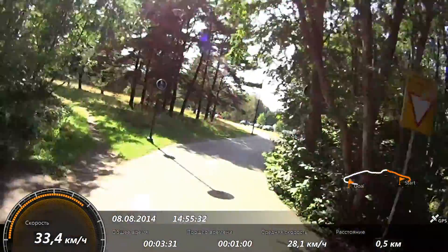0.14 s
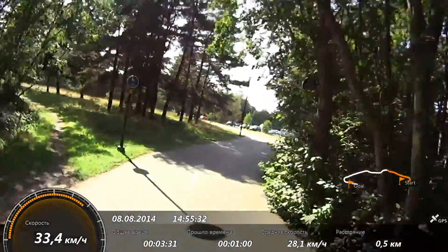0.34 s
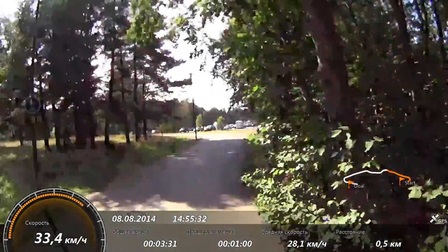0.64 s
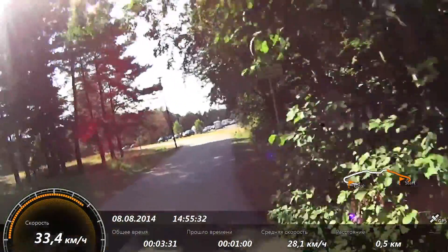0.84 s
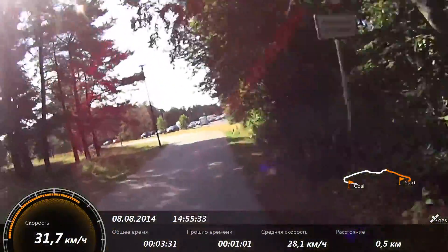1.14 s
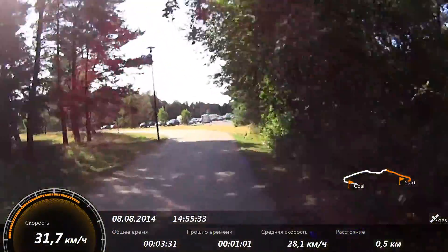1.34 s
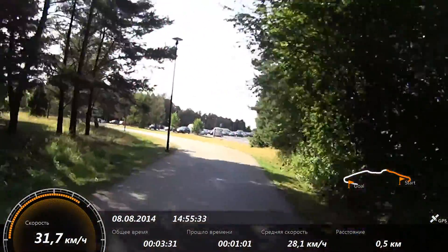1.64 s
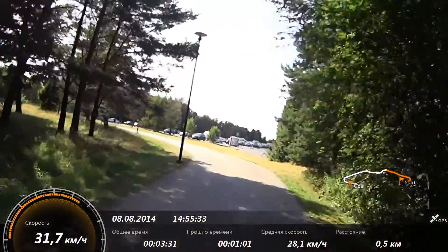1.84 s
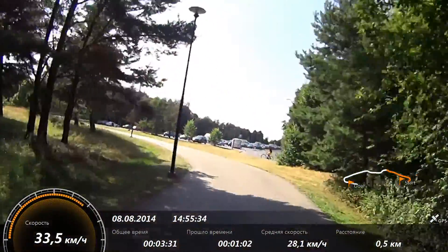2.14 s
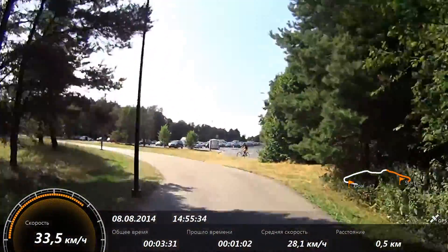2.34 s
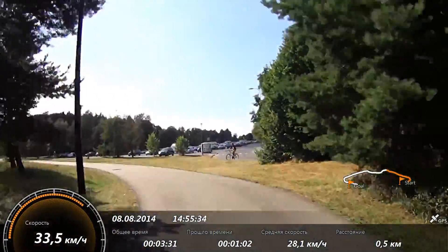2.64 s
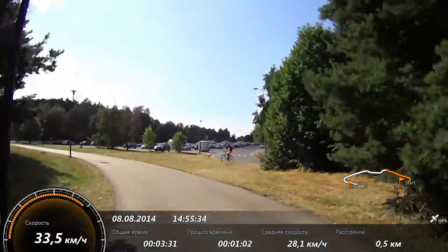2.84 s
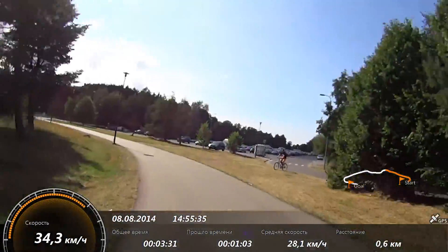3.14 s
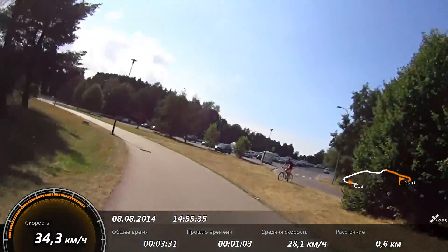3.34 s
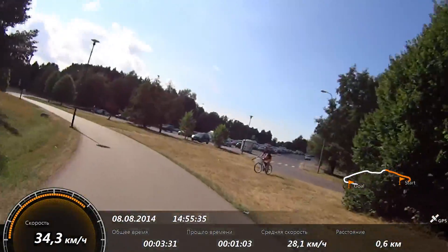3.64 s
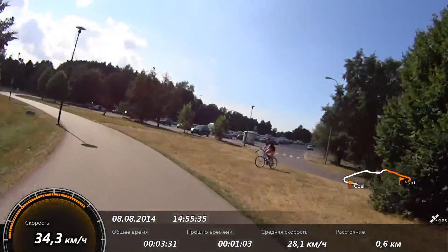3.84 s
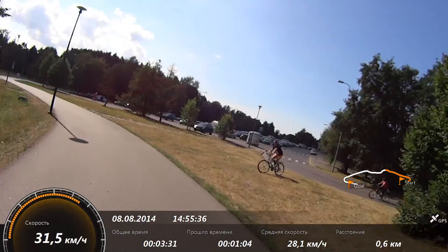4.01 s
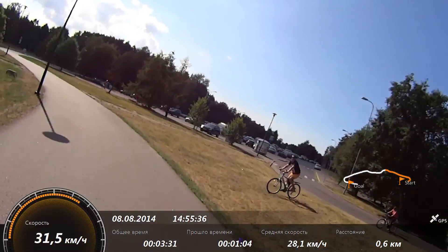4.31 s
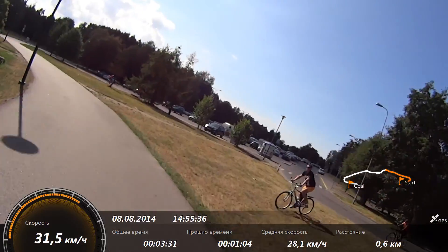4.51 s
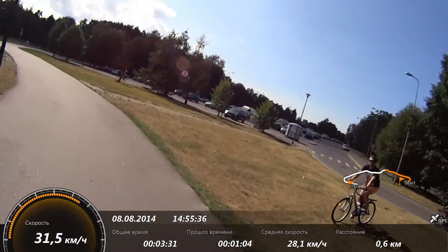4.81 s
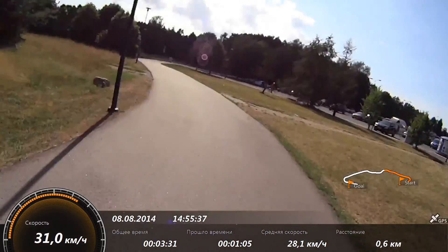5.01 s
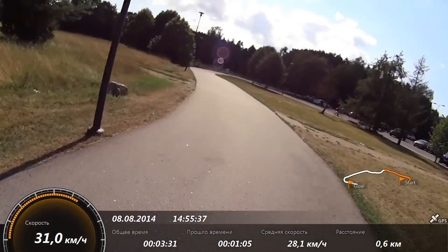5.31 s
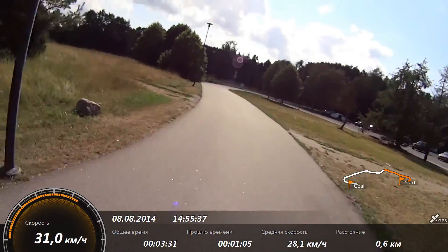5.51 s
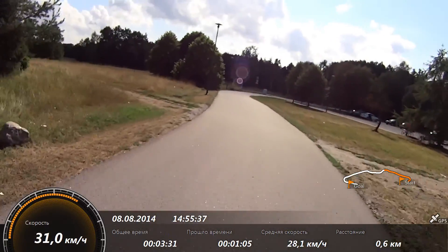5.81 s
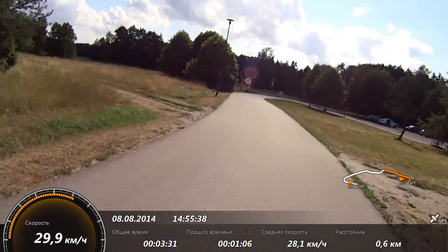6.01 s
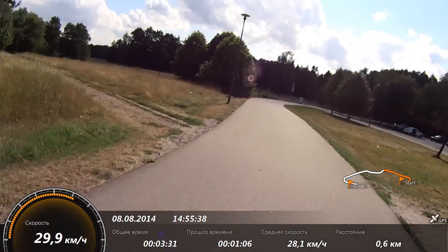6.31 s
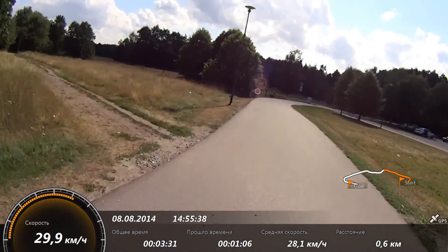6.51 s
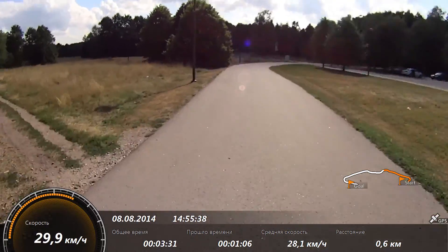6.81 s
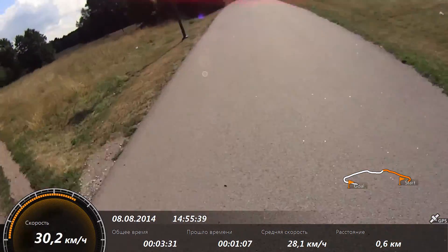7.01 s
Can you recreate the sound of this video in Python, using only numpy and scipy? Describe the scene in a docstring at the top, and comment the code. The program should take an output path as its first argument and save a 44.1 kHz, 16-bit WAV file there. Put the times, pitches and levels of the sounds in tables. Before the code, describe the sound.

Continuous rough rolling of small hard wheels on asphalt, with a hollow boom and faintly pitched whirr, dominates a dry outdoor stereo pickup. Wind buffets and flutters low, with soft airy hiss above. The roll eases, takes a few rough patches, knocks once, swells strongly near five seconds, then sinks to a short lull. A small tick sounds in the lull, the roll comes back weaker, and the gear clicks rapidly at the end.

```python
"""On a bend of an asphalt path, inline skates coast past at the wearer's own feet, heard at a worn camera.
Road grain excites the resonances of wheels and frames; the roll dips and swells, and single pitches stand out.
Turbulence rumbles and flutters at the two microphone ports, buffets push, and soft rush and hiss swell.
The gear knocks as short damped modes with a crack and thump; a stone chip ticks as decaying noise."""
import sys
import numpy as np
from scipy import signal
from scipy.fft import rfft, irfft
from scipy.io import wavfile

SR = 44100
rng = np.random.default_rng(int(sys.argv[2]) if len(sys.argv) > 2 else 0)


def store_wav(level_fs):
    """Save 16-bit WAV to argv[1]."""
    pcm = np.round(np.clip(np.atleast_2d(level_fs), -1, 1) * 32767)
    wavfile.write(sys.argv[1], SR, pcm.T.astype(np.int16))


N = 315315
TIME, FREQS = np.arange(N) / SR, np.fft.rfftfreq(N, 1 / SR)

# All spectra are relative: the coloured noise is scaled to rms 1 afterwards.
# Likeness of the two ports: pitch_hz, likeness (0 to 1)
PORT_LIKENESS = [(150, .99), (260, .85), (345, .45), (460, .78), (710, .55), (780, .93), (1200, .86),
                 (1600, .6), (2300, .2), (3100, .6), (4300, .35), (4750, .65), (7500, .35), (10500, .8)]
# Phase between the ports: pitch_hz, left_leads_rad
PORT_LEAD = [(30, -.1), (120, -.35), (310, -.75), (460, -2.1), (600, -2), (700, -2.8), (800, -1.45),
             (1150, -1.15), (1440, -.1), (1620, -1.2), (1850, -2.8), (2200, -2.3), (2700, -1), (4000, -.1)]
# Level between the ports: pitch_hz, left_minus_right_db
PORT_DIFFERENCE = [(250, 0), (340, 2.3), (480, -1.5), (690, -2.8), (760, 3), (1000, 2.7), (1280, -2.5),
                   (1520, -5.5), (1750, -.3), (2600, .5), (4400, -1.5), (5100, -3.5), (6000, 0),
                   (10000, -.7)]

# Base curve of the roll: time_s, level_db (before each layer's offset), contact_coarseness_db
ROLL_CURVE = [(0.0, -22.5, 0), (0.6, -24.2, 0), (1.62, -26.5, 0), (1.85, -23.5, -1.5), (2.9, -30, 1),
              (3.7, -30, -0.5), (4.1, -29, -0.5), (4.65, -28.5, .3), (5.08, -22, -0.5), (5.28, -22.5, 1.5),
              (5.38, -21, 4.5), (5.7, -21.5, 2), (5.86, -26.5, 2.5), (6.2, -32, 6.5), (6.36, -41.5, 9),
              (6.64, -45.5, 9.5), (6.76, -30, 1), (7.15, -34, 6)]
# Rough patches of asphalt that alter the roll: middle_s, length_s (between 1/e points),
# level_change_db, coarseness_change_db
ROUGH_PATCHES = [(0.718, 0.14, 1, 1), (3.08, 0.084, 5.5, -0.5), (3.316, 0.096, 2.5, 0.5),
                 (3.482, 0.056, -0.5, 3.5), (5.59, 0.033, 0.5, 3), (5.944, 0.061, 2.5, 2),
                 (6.486, 0.11, 5, -0.5)]
# Resonances of wheels, frames and boots, and a notch: pitch_hz, width_hz (where the lift halves), lift_db
SKATE_RESONANCES = [(462, 39, 6.5), (777, 100, 7), (1239, 107, 5), (1456, 120, 8), (1860, 250, -0.5),
                    (2197, 170, 3.5)]
# Ring of the wheels: pitch_hz, density_db
RING_SPECTRUM = [(500, -24), (850, -47), (980, -8), (1120, 3), (1350, 1.5), (1600, 0.5), (1800, 1),
                 (2100, -18.5), (3000, -25), (6000, -41.5)]
# Boom of the boots: pitch_hz, density_db
BOOM_SPECTRUM = [(60, -26), (250, -9.5), (380, -8.5), (540, -4.5), (680, 0.5), (860, 1), (1000, -5),
                 (1400, -21), (3000, -73)]
# Rasp at the contact patch: pitch_hz, density_db
RASP_SPECTRUM = [(1000, -40), (1700, -18.5), (2000, 3.5), (2400, 0), (2800, -2.5), (3300, -9.5),
                 (4000, -16.5), (5000, -14.5), (6200, -22), (7600, -26), (9300, -28.5), (11000, -47)]
# Spells when one resonance of the wheels stands out: start_s, end_s, pitch_hz, half_width_hz (at -6 dB),
# level_db, left_minus_right_db (added to the difference between ports)
RESONANCE_SPELLS = [(-.15, 0.647, 1494, 99, -27.5, 4.5), (1.696, 2.444, 1400, 100, -37, -2),
                    (2.987, 3.594, 2000, 219, -37, 5.5), (5.218, 5.85, 2350, 218, -27.5, 2),
                    (6.117, 6.755, 3450, 480, -43.5, 7)]
# Shifts of weight that narrow or widen the upper ring: start_s, end_s, side_change_db
WEIGHT_SHIFTS = [(-.2, 0.6, -4.5), (0.55, 1.78, 3.5), (1.75, 2.95, -2), (2.95, 3.58, -6), (3.55, 4.25, 3.5),
                 (4.2, 5.1, 1), (6.25, 6.52, -4)]

# Airflow over the microphone: time_s, level_db (before unsteadiness and each layer's offset)
AIRFLOW = [(0.0, -35.5), (0.42, -39), (0.58, -37), (1.6, -36), (1.9, -39), (2.3, -40), (3.5, -38.5),
           (4.62, -36), (4.75, -29.5), (5.02, -34.5), (5.35, -29.5), (5.75, -30.5), (6.15, -41.5),
           (6.6, -52.5), (6.76, -40.5), (7.15, -40)]
# Gusts that break into fast flutter: start_s, end_s, small_eddy_lift_db
FLUTTER_GUSTS = [(-.2, 0.7, 6), (0.546, 1.85, 12), (1.797, 2.95, 6), (3.686, 4.162, 11.5),
                 (4.096, 4.703, 6), (4.745, 5.08, 8)]
# Rumble of large eddies: pitch_hz, density_db
LARGE_EDDY_SPECTRUM = [(20, -12), (50, -8.5), (85, -1.5), (130, 0.5), (170, -9.5), (260, -14), (1000, -82)]
# Flutter of small eddies: pitch_hz, density_db
SMALL_EDDY_SPECTRUM = [(60, -24), (120, -6.5), (165, 2), (210, -2), (270, -7), (350, -10), (500, -14.5),
                       (1500, -62)]
# Swells of soft rush: start_s, end_s, level_db (before the common offset)
RUSH_SPELLS = [(-.1, 0.558, -41.5), (0.598, 1.436, -42.5), (1.463, 2.338, -44.5), (2.35, 2.9, -45.5),
               (3.003, 3.517, -45.5), (3.67, 4.038, -48.5), (4.198, 5.142, -48.5), (5.91, 5.99, -41),
               (6.1, 6.747, -48), (6.86, 7.158, -42)]
# Soft rush: pitch_hz, density_db
RUSH_SPECTRUM = [(1500, 2), (2600, -7), (3300, 4), (3950, 2.5), (4300, -0.5), (4700, -2.5), (5350, -0.5),
                 (5800, -10), (11000, -33)]
# Steady open air: pitch_hz, density_db
AIR_SPECTRUM = [(100, 7), (1000, 8), (3000, 3.5), (6000, -13), (9500, -1.5), (11000, -3)]
# Spells of thin hiss: start_s, end_s, level_db (before the common offset and flicker)
HISS_SPELLS = [(-.02, 0.514, -45.5), (1.775, 2.346, -47.5), (2.958, 3.545, -52), (4.958, 5.152, -46.5)]
# Thin hiss: pitch_hz, density_db
HISS_SPECTRUM = [(3000, -25), (4200, -7), (4700, 3.5), (5100, 2), (5500, 0.5), (5800, -3.5), (6150, -5),
                 (6500, 0.5), (7200, -6.5), (7550, -18), (11000, -30)]
# Slow pressure buffets: middle_s, level_db (added in amplitude to the steady churn)
PRESSURE_BUFFETS = [(0.24, -40), (0.65, -36), (1.49, -39), (2.42, -38.5), (3.1, -31), (3.18, -43),
                    (3.56, -41), (4.26, -38), (6.18, -28.5), (6.92, -44)]
# Slow pressure: pitch_hz, gain_db
BUFFET_SPECTRUM = [(8, -36), (20, 3.5), (35, 0), (55, 0.5), (90, -2.5), (250, -72), (1000, -80)]

# Knocks of the gear: start_s, ring_db (before the common offset), pitch_hz (main mode),
# upper_modes_db, crack_db (before the common offset), thump_db
GEAR_KNOCKS = [(4.204, -4, 1190, -2, -26.5, -48), (5.188, -3, 1210, -16, -52, -47),
               (7.008, -18, 1110, -1, -50, -26), (7.0195, -5, 1173, 5, -34, -28),
               (7.079, -9, 1220, 1.5, -45, -35)]
# Modes of a knock: ratio (to the main pitch), level_db, t60_s
GEAR_MODES = [(.68, -18, 0.026), (1, 2.5, 0.014), (1.3, -4.5, 0.0075), (1.94, -10.5, .014),
              (2.38, -13.5, .016), (3.4, -27, 0.0083)]
# Crack of a knock: pitch_hz, density_db
CRACK_SPECTRUM = [(300, -22), (900, 11), (2800, -20), (4000, 10), (5000, -13), (8000, -20), (11000, -32)]
# Thump of a knock: pitch_hz, density_db
THUMP_SPECTRUM = [(30, -4), (80, 6.5), (200, -7), (700, -12), (1500, -46)]
# Stone chip flicked by a wheel: start_s, level_db
STONE_CHIPS = [(6.5124, -16.5)]
# Tick of a chip: pitch_hz, density_db
CHIP_SPECTRUM = [(300, -19), (1300, 1), (3200, 6), (4600, -10), (7000, -1.5), (11000, -6)]


def gain_of(db):
    """Logarithmic level: decibels become an amplitude ratio."""
    return 10 ** (np.asarray(db) / 20)


def evened(x):
    """Normalization of power: scales a signal to rms 1."""
    return x / np.sqrt(np.mean(x ** 2) + 1e-20)


def read(points):
    """Logarithmic frequency: interpolates (Hz, value) points over every bin on a log axis."""
    hz, value = np.transpose(points)
    return np.interp(np.log(FREQS + 1), np.log(hz + 1), value)


def follow(rows):
    """Linear interpolation: gives each column of a time curve sample by sample."""
    times, *columns = np.transpose(rows)
    return [np.interp(TIME, times, column) for column in columns]


def spell(start, end, fade_s):
    """Trapezoidal envelope: rises from 0 to 1, holds, and falls again by the end."""
    return np.clip(np.minimum(TIME - start, end - TIME) / fade_s, 0, 1)


def hump(middle, length):
    """Gaussian envelope: rises smoothly to 1 and falls."""
    return np.exp(-(2 * (TIME - middle) / length) ** 2)


def add(mix, start_s, sound):
    """Superposition: adds a sound into the mix from its start time."""
    part = mix[..., round(start_s * SR):][..., :sound.shape[-1]]
    part += sound[..., :part.shape[-1]]


def wobble(rate_hz):
    """Band-limited random motion: rms 1, up to about the given rate, with slow drift reduced."""
    lowpass = 1 / (1 + (FREQS / rate_hz) ** 2)
    highpass = FREQS / (FREQS + rate_hz / 10)
    return evened(irfft(rfft(rng.standard_normal(N)) * lowpass * highpass, N))


def noise():
    """Statistical independence: two unrelated white noises."""
    return rng.standard_normal((2, N))


def at_ports(drive, colour_db):
    """Partial coherence: colours two drives and blends them into the partly alike port signals."""
    shared, separate = rfft(drive)
    likeness = np.clip(read(PORT_LIKENESS), 0, 1)
    half_difference_db = read(PORT_DIFFERENCE) / 2
    left = shared * np.exp(1j * read(PORT_LEAD)) * gain_of(half_difference_db)
    blend = likeness * shared + np.sqrt(1 - likeness ** 2) * separate
    right = blend * gain_of(-half_difference_db)
    return evened(irfft(np.array([left, right]) * gain_of(colour_db), N))


def road(grits_per_s, grit_size):
    """Random excitation: fine texture is white noise, larger grains are separate impulses."""
    blows = noise() * (rng.random(N) < grits_per_s / SR)
    return noise() + grit_size * evened(blows)


def rolling():
    """Contact roughness: level and coarseness of the roll in dB, altered by the rough patches."""
    level, coarse = follow(ROLL_CURVE)
    for middle, length, level_db, coarse_db in ROUGH_PATCHES:
        patch = hump(middle, length)
        level = level + level_db * patch
        coarse = coarse + coarse_db * patch
    return level, coarse


def wheels(ring_db=-1.72, boom_db=-5.0, rasp_db=-10.5, boom_per_coarse=1.0, rasp_per_coarse=1.3,
           judder_db=0.84, rasp_judder_db=1.2):
    """Forced resonance: road blows ring the wheels; coarse contact brings out boom and rasp."""
    level, coarse = rolling()
    body_db = sum(lift / (1 + (2 * (FREQS - hz) / width) ** 2) for hz, width, lift in SKATE_RESONANCES)
    load = wobble(rate_hz=15)
    # one drive excites all three layers, so their blows coincide
    drive = road(grits_per_s=1900, grit_size=0.71)
    ring_level = level + ring_db + judder_db * load
    boom_level = level + boom_db + boom_per_coarse * coarse
    rasp_level = level + rasp_db + rasp_per_coarse * coarse + rasp_judder_db * load
    ring = gain_of(ring_level) * at_ports(drive, read(RING_SPECTRUM) + body_db)
    boom = gain_of(boom_level) * at_ports(drive, read(BOOM_SPECTRUM) + body_db)
    rasp = gain_of(rasp_level) * at_ports(drive, read(RASP_SPECTRUM) + body_db)
    return ring + boom + rasp


def standing_out(fade_s=0.089):
    """Resonant filtering: rough noise swells around one pitch of the wheels in each spell."""
    out = np.zeros((2, N))
    for start, end, hz, half_width, db, side_db in RESONANCE_SPELLS:
        swell = spell(start, end, fade_s)
        resonance_db = -20 * np.log10(1 + ((FREQS - hz) / half_width) ** 2)
        rough_band = at_ports(road(grits_per_s=900, grit_size=0.61), resonance_db)
        port_gain = gain_of([[db + side_db / 2], [db - side_db / 2]])
        out += swell * port_gain * rough_band
    return out


def footwork(skates, centre_hz=2200, octaves=0.73, shift_s=0.09):
    """Mid-side decomposition: shifting weight scales the port difference in the upper ring."""
    mid, side = (skates[0] + skates[1]) / 2, (skates[0] - skates[1]) / 2
    band = np.exp(-(np.log2((FREQS + 1) / centre_hz) / octaves) ** 2)
    upper = irfft(rfft(side) * band, N)
    spread_db = sum(db * spell(start, end, shift_s) for start, end, db in WEIGHT_SHIFTS)
    side = side + (gain_of(spread_db) - 1) * upper
    return np.array([mid + side, mid - side])


def wind(large_db=-0.4, small_db=-6.5, flutter_growth=0.28, cruise_db=-36, gust_fade_s=0.17,
         unsteady_db=1.0):
    """Turbulence: large eddies rumble with the flow; small ones grow faster with it and in gusts."""
    flow = follow(AIRFLOW)[0] + unsteady_db * wobble(rate_hz=37)
    gusts = sum(db * spell(start, end, gust_fade_s) for start, end, db in FLUTTER_GUSTS)
    flutter_level = flow + flutter_growth * (flow - cruise_db) + gusts + small_db
    rumble = gain_of(flow + large_db) * at_ports(noise(), read(LARGE_EDDY_SPECTRUM))
    flutter = gain_of(flutter_level) * at_ports(noise(), read(SMALL_EDDY_SPECTRUM))
    return rumble + flutter


def rush(swell_db=0.5, fade_s=0.058, air_db=-56):
    """Shaped broadband noise: a soft rush swells and fades over steady open air."""
    level = sum(gain_of(db + swell_db) * spell(start, end, fade_s) for start, end, db in RUSH_SPELLS)
    swells = level * at_ports(noise(), read(RUSH_SPECTRUM))
    air = gain_of(air_db) * at_ports(noise(), read(AIR_SPECTRUM))
    return swells + air


def hiss(hiss_db=4, flicker_db=2.5, fade_s=0.037):
    """Amplitude modulation: a thin hiss flickers at random within separate spells."""
    level = sum(gain_of(db) * spell(start, end, fade_s) for start, end, db in HISS_SPELLS)
    flicker = gain_of(hiss_db + flicker_db * wobble(rate_hz=61))
    return level * flicker * at_ports(noise(), read(HISS_SPECTRUM))


def buffets(length_s=0.082, steady_db=-45):
    """Long-wave pressure: pushes of air over a weak steady churn reach both ports alike."""
    level = gain_of(steady_db) + sum(gain_of(db) * hump(middle, length_s) for middle, db in PRESSURE_BUFFETS)
    churn = evened(irfft(rfft(noise()[0]) * gain_of(read(BUFFET_SPECTRUM)), N))
    return level * churn


def knocks(rise_s=0.0016, port_lag_s=0.0001, knock_db=4, crack_s=0.0024, thump_s=0.01):
    """Damped modes: hard plastic rings, right port first, with decaying noise as crack and thump."""
    rings, cracks, thumps = np.zeros((2, N)), np.zeros(N), np.zeros(N)
    # the left row of the clock runs late
    t = np.maximum(np.arange(SR // 20) / SR - np.array([[port_lag_s], [0]]), 0)
    for start, db, hz, upper_db, crack_db, thump_db in GEAR_KNOCKS:
        modes = [gain_of(mode_db - 60 * t / t60) * np.sin(2 * np.pi * hz * ratio * t)
                 for ratio, mode_db, t60 in GEAR_MODES]
        ring = sum(modes[:2]) + gain_of(upper_db) * sum(modes[2:])
        onset = 1 - np.exp(-t / rise_s)
        add(rings, start, gain_of(db + knock_db) * ring * onset)
        add(cracks, start, gain_of(crack_db + knock_db) * np.exp(-t[1] / crack_s))
        add(thumps, start, gain_of(thump_db) * np.exp(-t[1] / thump_s))
    crack = cracks * at_ports(noise(), read(CRACK_SPECTRUM))
    thump = thumps * at_ports(noise(), read(THUMP_SPECTRUM))
    return rings + crack + thump


def chips(contact_s=0.002, tail_db=-22, tail_t60=0.075):
    """Brief impact: a stone chip gives a bright noise tick with a faint exponential tail."""
    level, t = np.zeros(N), np.arange(SR // 20) / SR
    contact = np.exp(-(t / contact_s) ** 2)
    tail = gain_of(tail_db - 60 * t / tail_t60)
    for start, db in STONE_CHIPS:
        add(level, start, gain_of(db) * (contact + tail))
    return level * at_ports(noise(), read(CHIP_SPECTRUM))


def scene():
    """Superposition in the open: skates, air, knocks and chip add without reverberation."""
    skates = footwork(wheels() + standing_out())
    air = wind() + rush() + hiss() + buffets()
    return skates + air + knocks() + chips()


def record(dry, edge_hz=11100):
    """Band limitation: the camera passes only what lies below its upper edge."""
    lowpass = signal.firwin(511, edge_hz, window=("kaiser", 9), fs=SR)
    return signal.oaconvolve(dry, lowpass[None], "same")


dry = scene()
out = record(dry)
store_wav(out)
```